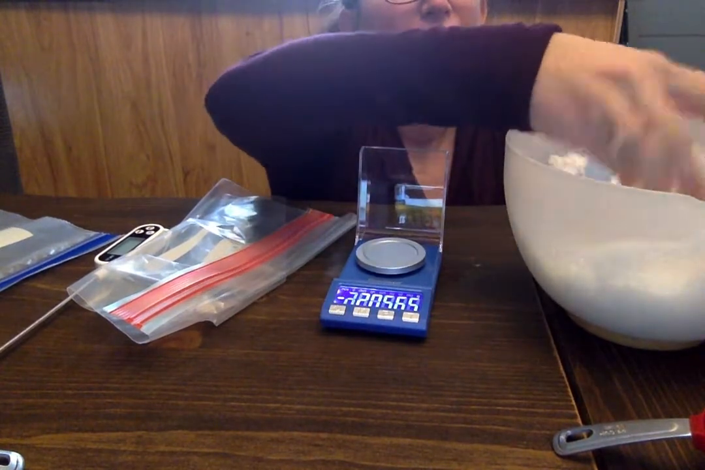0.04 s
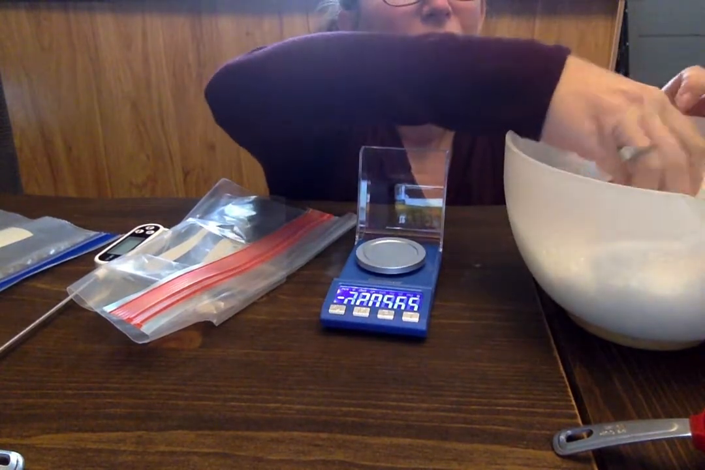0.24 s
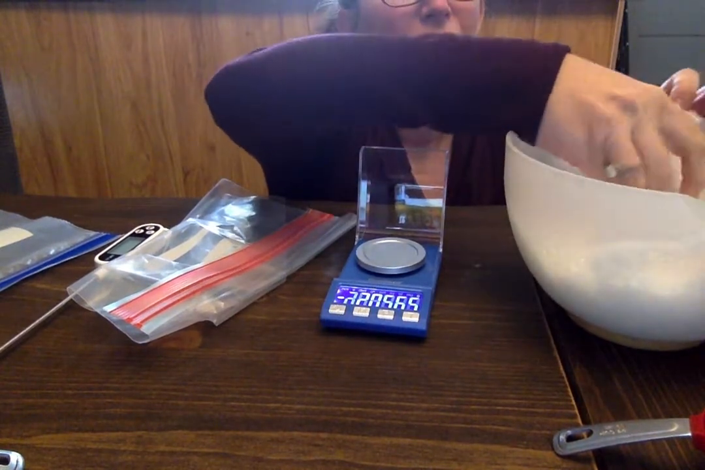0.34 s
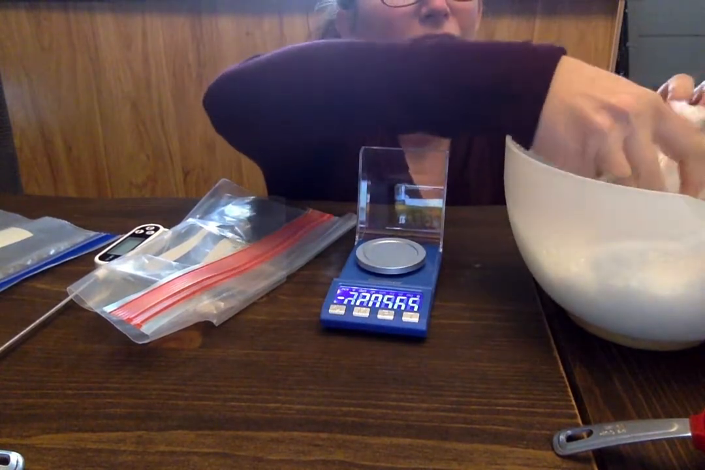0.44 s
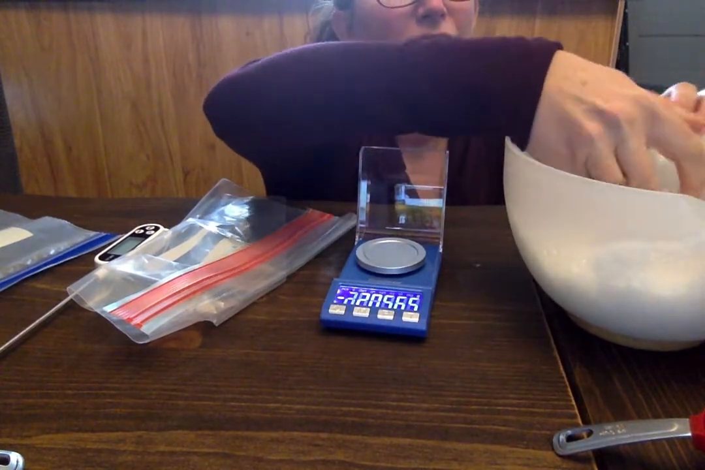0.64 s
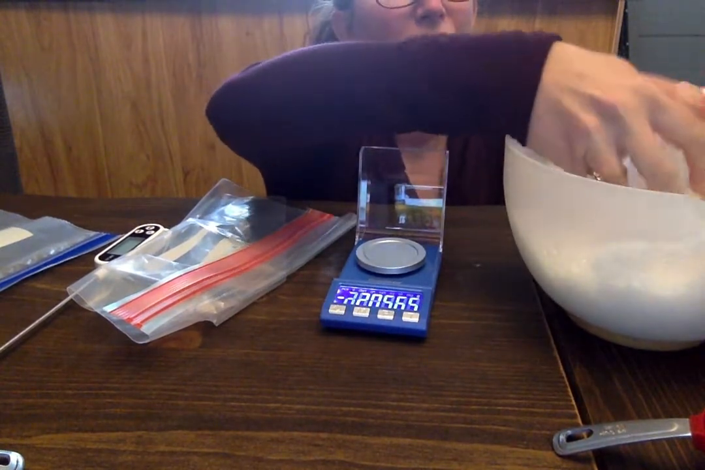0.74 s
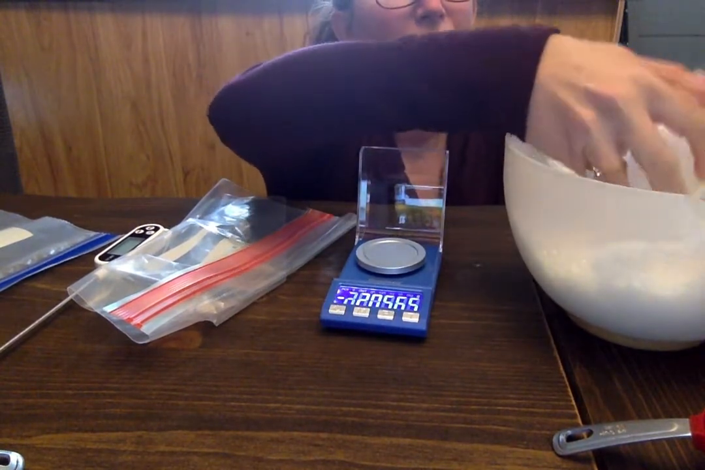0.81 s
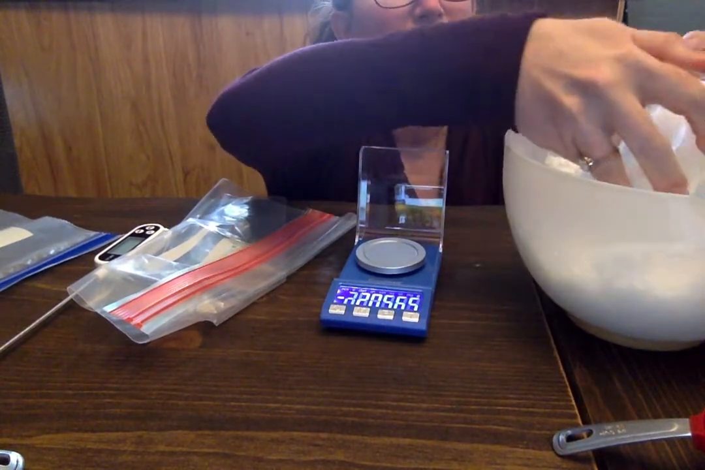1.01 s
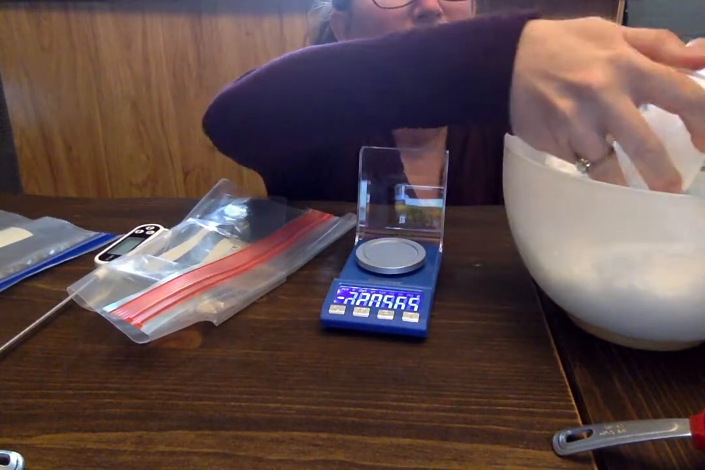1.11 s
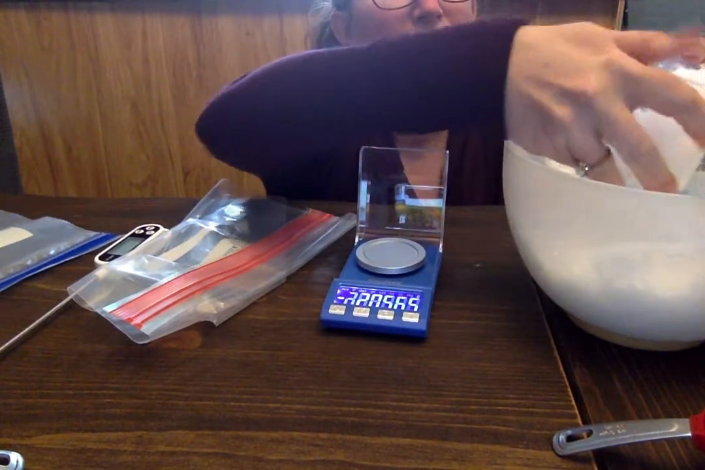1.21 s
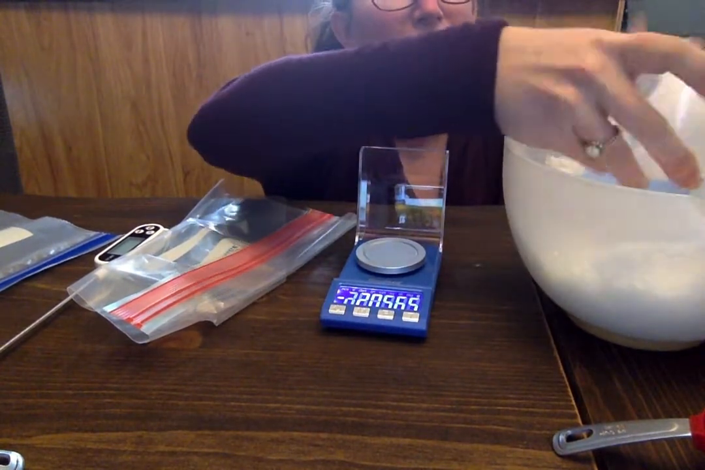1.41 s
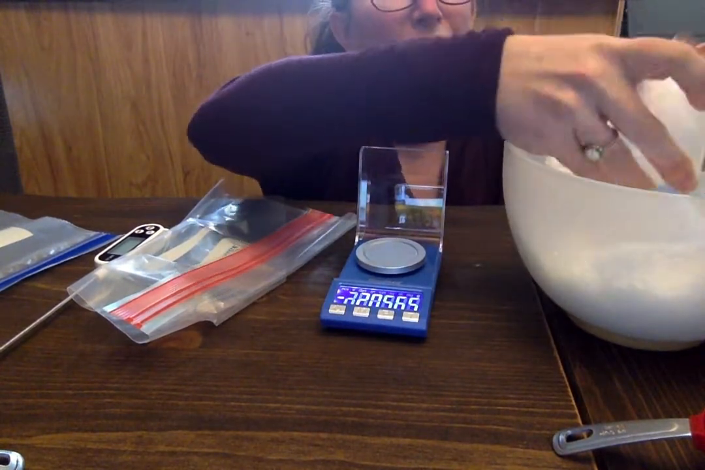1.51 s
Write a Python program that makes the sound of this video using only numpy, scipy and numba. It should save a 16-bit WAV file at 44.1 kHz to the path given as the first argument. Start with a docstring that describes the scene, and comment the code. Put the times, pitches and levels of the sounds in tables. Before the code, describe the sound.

One loud crunch of packed snow in a bowl, followed by faint icy grinding and ticks.

```python
"""A small, faintly hissing room; one microphone close to a plastic bowl of packed snow on a table.
A beaker is pushed in: a crystal ticks, then the crust breaks in one loud crunch that rings the bowl.
Ice grains crackle and lone crystals snap as the beaker grinds on in small slips, each a hollow thud.
After about a second the bowl is bumped; last, the beaker scrapes briefly as it is lifted."""
import sys
import numpy as np
from scipy import signal
from scipy.fft import rfft, irfft
from scipy.io import wavfile
from scipy.ndimage import uniform_filter1d, map_coordinates
from numba import njit

SR = 44100
rng = np.random.default_rng(int(sys.argv[2]) if len(sys.argv) > 2 else 0)


def put_to_file(sound):
    """Save the sound as 16-bit audio at rate SR, in the file named by the first command-line argument."""
    columns = np.atleast_2d(sound).T  # one column per channel
    safe = np.clip(columns, -1, 1)
    whole_steps = np.round(safe * 32767)
    wavfile.write(sys.argv[1], SR, whole_steps.astype(np.int16))


N = 68355

# spectrum of the room tone: frequency_hz, relative_db
ROOM_TONE_SPECTRUM = [(18, -52), (30, -23), (204, 3.5), (584, -3.5), (666, -6), (1760, -17), (6720, -23.5),
                      (8520, -21), (10500, -27.5), (12600, -21.5), (16000, -32.5)]
# modes of the bowl: pitch_hz, t60_s, gain_db
BOWL_MODES = [(316, 0.06, -8.5), (391, 0.1, -14.5), (470, 0.15, -13), (570, 0.13, -15.5), (615.8, 0.06, -8),
              (676, 0.17, -8.5), (879, 0.094, -0.5), (1095, .22, 4), (1195, 0.11, -4), (1370, 0.29, -9),
              (1857, 0.086, -4.5), (2365, 0.13, -3.5), (3090, 0.3, -4.5)]
# plastic rubs on snow: centre_s, length_s, pitch_hz, width_hz, level_db
PLASTIC_RUBS = [(0.363, 0.0071, 3540, 370, -28), (0.99, 0.015, 4400, 556, -47.5),
                (1.044, 0.0055, 4080, 600, -52.5), (1.264, 0.011, 8400, 598, -62),
                (1.36, 0.028, 9000, 999, -66.5), (1.357, 0.024, 12350, 1499, -65),
                (1.544, 0.013, 1245, 120, -53), (1.544, 0.015, 1756, 300, -51),
                (1.544, 0.012, 2340, 248, -51), (1.546, 0.017, 4600, 204.5, -53.5),
                (1.546, 0.024, 8580, 2500, -58.5)]
# lone crystals snap: start_s, pitch_hz, relative_db
CRYSTAL_SNAPS = [(0.0803, 4182, -33.5), (.0825, 10900, -33), (.4577, 7400, -21), (0.555, 12200, -42),
                 (.668, 11920, -26.5), (0.694, 8350, -33.5), (0.709, 8770, -36), (.9552, 8440, -26),
                 (0.9568, 13900, -25), (1.042, 14400, -36), (1.18, 6994, -62)]
# the snow gives way or the bowl is bumped: start_s, pitch_hz, relative_db, rise_cycles (1 if less)
SLIPS_AND_BUMPS = [(0.1968, 900, -24, 0.78), (0.2119, 830, -10, 1.1), (.2262, 862, -10, 1.7),
                   (0.2347, 728, -4.5, 1.48), (.2385, 556, -18.5, 1.2), (.2434, 519.5, 4, 0.99),
                   (.2978, 730, -23, 0.7), (.3055, 658, -12.5, 1.35), (0.3132, 609, -16.5, 2.2),
                   (.343, 592, -18, 2.2), (.360, 695, -18.5, 1.4), (.366, 691, -19, 1.8),
                   (0.4831, 823, -33.5, 3.4), (.4925, 710, -29.5, 0.88), (.513, 865, -35.5, 1.1),
                   (0.517, 870, -32.5, 1.7), (0.569, 740, -22.5, 1.7), (0.5769, 1080, -25, 0.86),
                   (.5786, 637, -15.5, 1.2), (0.6271, 645, -34, 1.96), (0.6281, 1320, -27.5, 1.42),
                   (.7435, 1060, -35, 1.5), (0.7538, 1110, -35.5, 1.7), (.763, 704, -35.5, 1),
                   (0.7866, 1117, -28.5, 4), (.812, 946, -33.5, 6.6), (0.868, 840, -41, 2.5),
                   (.905, 767, -33.5, 1.18), (1.023, 399.8, -33, 4.1), (1.0282, 689, -31, 1.5),
                   (1.03, 166.6, -42, 1.94), (1.065, 316.7, -41.5, 2)]
# resonance of the hollow under the beaker: time_s, pitch_hz
HOLLOW_PITCH = [(.2, 706), (.26, 550), (.37, 634), (.5, 722), (.62, 690), (.74, 1080), (.8, 957), (.9, 860)]
# strength of the push: time_s, crackle_relative_db, grinding_db
PUSH_LEVELS = [(.192, -78.5, -80), (.2, -35.5, -29.5), (.215, -24, -12.5), (.248, -26, -50),
               (.29, -34, -29.5), (.375, -33, -34), (.435, -48, -46), (.495, -45, -47.5),
               (.54, -63.5, -55.5), (.59, -57.5, -55), (.62, -50.5, -61), (.695, -61.5, -74),
               (.72, -44.5, -46), (.757, -61, -59.5), (.795, -41, -38), (.84, -42, -62.5),
               (.893, -50.5, -67), (.92, -43.5, -49.5), (.96, -52, -79), (.995, -53, -93),
               (1.015, -67.5, -64.5), (1.12, -80, -79)]
# tone colour of breaking ice: frequency_hz, relative_db
ICE_SPECTRUM = [(30, -31.5), (110, -23.5), (250, -13.5), (500, -2.5), (1300, 4), (1800, 0.5), (2200, -3.5),
                (2900, -2), (3800, 7.5), (4700, 2), (6000, -7), (8000, 2.5), (9700, -3.5), (12000, 2),
                (13500, -6), (15500, 0.5)]
# the crust fractures: start_s, length_s, relative_db
CRUST_BREAKS = [(0.2055, 0.0031, -12.5), (0.21, 0.0049, -13.5), (0.229, 0.0086, -8.5), (0.232, 0.0012, -4),
                (0.237, 0.0081, -18), (0.2432, 0.0037, -8), (0.351, 0.015, -39), (0.565, 0.02, -37),
                (.578, 0.0078, -36), (0.6292, 0.0031, -34.5), (0.715, 0.0024, -41.5), (0.73, .003, -45),
                (0.7627, 0.0038, -41.5), (0.787, 0.0036, -33), (0.903, .008, -35.5), (0.909, 0.0076, -39),
                (0.93, 0.0076, -46.5), (1.094, 0.0046, -57.5)]

GRAINS_PER_S, GRAIN_SPREAD_DB = 4600, 3
CRYSTALS_PER_BAND_PER_S, CRYSTAL_WIDTH_HZ, CRYSTAL_POWER_SHARE = 430, 1200, .9
PATCH_PER_S, PATCH_DB = 24, 3.5  # the mix of crystal sizes keeps changing
JUDDER_PER_S, JUDDER_DB = 130, 1.2  # the beaker advances unevenly


def undb(db):
    return 10 ** (np.asarray(db) / 20)


def unit(x):
    return x / np.sqrt(np.mean(x ** 2))


def curve(table, column):
    """One column of a table, joined by straight lines in time."""
    rows = np.array(table)
    return np.interp(np.arange(N) / SR, rows[:, 0], rows[:, column])


def wander(per_s):
    """Random levels joined by ramps; spread near 1."""
    hold = int(SR / per_s)
    return 1.3 * uniform_filter1d(rng.standard_normal(N)[np.arange(N) // hold], hold)


def colour(x, spectrum, size=1024):
    """Minimum-phase filter with the given spectral shape and unit power gain."""
    hz, db = np.array(spectrum).T
    bins_hz = np.arange(size + 1) * SR / (2 * size)
    gain = undb(np.interp(np.log(bins_hz + 1), np.log(hz), db))
    cepstrum = irfft(np.log(unit(gain)))
    cepstrum[1:size] *= 2
    cepstrum[size + 1:] = 0
    return signal.fftconvolve(x, irfft(np.exp(rfft(cepstrum))))[:N]


@njit
def moving_bandpass(x, hz, width_hz):
    """State-variable filter with a centre for every sample."""
    out, mid, low = np.empty(len(x)), 0., 0.
    for i in range(len(x)):
        g, damping = np.tan(np.pi * hz[i] / SR), width_hz / hz[i]
        swing = (mid + g * (x[i] - low)) / (1 + g * (g + damping))
        mid, low = 2 * swing - mid, low + 2 * g * swing
        out[i] = damping * swing
    return out


def band(x, hz, width_hz):
    """Resonance with gain 1 at its centre."""
    return moving_bandpass(x + 1e-18, hz * np.ones(N), float(width_hz))


def grains(per_s):
    """Dense train of tiny ice fractures, a few much larger than the rest."""
    breaks = rng.random(N) < per_s / SR
    size = undb(GRAIN_SPREAD_DB * np.minimum(rng.exponential(size=N), 4))
    return unit(breaks * size * rng.choice([-1, 1], N))


def ringing_grains(per_s, hz, width_hz, skirt=2):
    """Grains ring a resonance; a second, wider band trims its skirts."""
    ring = band(grains(per_s), hz, width_hz)
    return unit(band(ring, hz, skirt * width_hz))


def room_tone(level_db=-65):
    """Faint, steady air behind everything."""
    return undb(level_db) * unit(colour(rng.standard_normal(N), ROOM_TONE_SPECTRUM))


def room(direct, t, t60_s=.3, delay_s=.0015, wet_db=-13.5):
    """A short diffuse tail with a slight boom, well under the direct sound this close."""
    tail = rng.standard_normal(N) * undb(-60 * t / t60_s) * (t > delay_s)
    wet = signal.fftconvolve(direct, tail / np.sqrt(np.sum(tail ** 2)))[:N]
    boom = undb(3) * band(wet, hz=180, width_hz=51)
    return direct + undb(wet_db) * (wet + boom)


def bowl_ring(snow):
    """Every sound in the snow rings the modes of the bowl."""
    return sum(undb(db) * band(snow, hz, np.log(1000) / (np.pi * t60_s)) for hz, t60_s, db in BOWL_MODES)


def wall_echo(ice, t, lag_s=.00031, gain=.14):
    """Ice sounds mirror off the bowl wall, inverted."""
    return -gain * map_coordinates(ice, [(t - lag_s) * SR])


def table_shove(t, centre_s=.246, width_s=.0015, level_db=-22.5):
    """One low pulse as the crust collapses and presses the bowl on the table."""
    return undb(level_db) * np.exp(-((t - centre_s) / width_s) ** 2)


def plastic_rubs(t):
    """Short narrow-band scrapes of plastic on snow."""
    out = np.zeros(N)
    for centre_s, length_s, hz, width_hz, db in PLASTIC_RUBS:
        swell = np.exp(-2 * ((t - centre_s) / length_s) ** 2)
        out += undb(db) * ringing_grains(GRAINS_PER_S, hz, width_hz) * swell
    return out


def crystal_snaps(t, decay_s=.0008, low_cut_hz=3300):
    """Lone crystals break in bright ticks about a millisecond long."""
    out = np.zeros(N)
    for start_s, hz, db in CRYSTAL_SNAPS:
        fade = (t >= start_s) * np.exp(-np.abs(t - start_s) / decay_s)
        ring = unit(band(rng.standard_normal(N), hz, width_hz=950) * fade)
        splash = unit(rng.standard_normal(N) * fade)
        out += undb(db) / 2 * (ring + .6 * splash) * np.sqrt(np.mean(fade ** 2))
    return signal.sosfilt(signal.butter(4, low_cut_hz, "high", fs=SR, output="sos"), out)


def thuds(t, roughness=.35, trim_db=-2):
    """Each slip or bump swells and dies within a few rough cycles."""
    out, size = np.zeros(N), 4096
    age = t[:size]
    for start_s, hz, db, rise_cycles in SLIPS_AND_BUMPS:
        rise = age * hz / max(rise_cycles, 1)
        swell = undb(db + trim_db) * (rise * np.exp(1 - rise)) ** 2
        octave = signal.butter(4, [hz / np.sqrt(2), hz * np.sqrt(2)], "band", fs=SR, output="sos")
        rough = unit(signal.sosfilt(octave, rng.standard_normal(2 * size))[size:])
        i = int(start_s * SR)
        out[i:i + size] += swell * (np.sin(2 * np.pi * hz * age) + roughness * rough)
    return out


def hollow_grinding():
    """Grains sound the hollow under the beaker, whose pitch rises as it fills."""
    hz = curve(HOLLOW_PITCH, column=1)
    return ringing_grains(GRAINS_PER_S, hz, width_hz=560, skirt=1.2) * undb(curve(PUSH_LEVELS, column=2))


def ice_crackle():
    """Grains click and crystals ring at their own pitches under the juddering push."""
    crystals = np.zeros(N)
    for hz in np.arange(1200, 16000, 750):
        ring = ringing_grains(CRYSTALS_PER_BAND_PER_S, hz, CRYSTAL_WIDTH_HZ)
        crystals += ring * undb(PATCH_DB * wander(PATCH_PER_S))
    clicks = np.sqrt(1 - CRYSTAL_POWER_SHARE) * grains(GRAINS_PER_S)
    push_db = curve(PUSH_LEVELS, column=1) + JUDDER_DB * wander(JUDDER_PER_S)
    return (clicks + np.sqrt(CRYSTAL_POWER_SHARE) * unit(crystals)) * undb(push_db)


def easing_push(ice, t, start_s=.74, length_s=.08, depth=.47):
    """As the push eases, fewer coarse grains break and the crackle thins."""
    cut = depth * np.clip((t - start_s) / length_s, 0, 1)
    return ice - cut * band(ice, hz=1700, width_hz=2000)


def crust_crunch(t, trim_db=-.5):
    """Where the crust breaks, countless grains go at once in a burst of milliseconds."""
    power = np.zeros(N)
    for start_s, length_s, db in CRUST_BREAKS:
        from_centre = 2 * (t - start_s) / length_s - 1
        power += undb(db + trim_db) ** 2 * np.exp(-np.minimum(from_centre ** 2, 80))
    return rng.standard_normal(N) * np.sqrt(power)


def scene():
    """Snow, bowl and room as they reach the microphone, in mono."""
    t = np.arange(N) / SR
    ice = colour(ice_crackle() + crust_crunch(t), ICE_SPECTRUM)
    ice = easing_push(ice, t) + crystal_snaps(t)
    snow = ice + wall_echo(ice, t) + hollow_grinding() + thuds(t) + plastic_rubs(t) + table_shove(t)
    return (room_tone() + room(snow + bowl_ring(snow), t))[None]


def record(dry):
    """The microphone flattens the loudest peaks and cuts the top."""
    overload, top_hz = .8, 15800
    squashed = dry / (1 + (dry / overload) ** 4) ** (1 / 4)
    return signal.sosfilt(signal.ellip(10, .2, 80, top_hz, fs=SR, output="sos"), squashed)


dry = scene()
out = record(dry)
put_to_file(out)
```